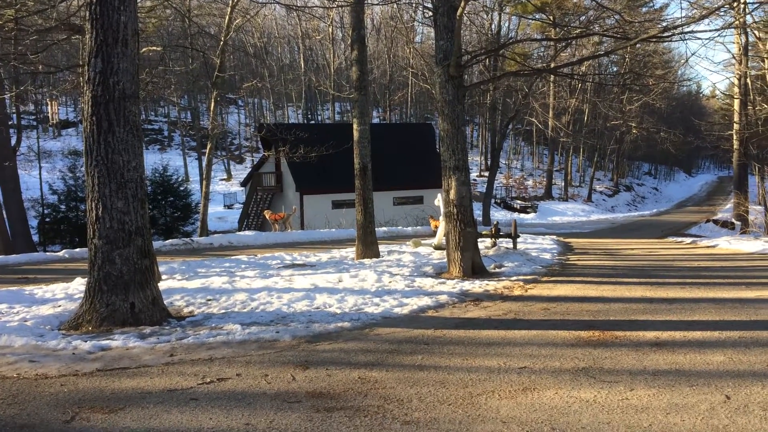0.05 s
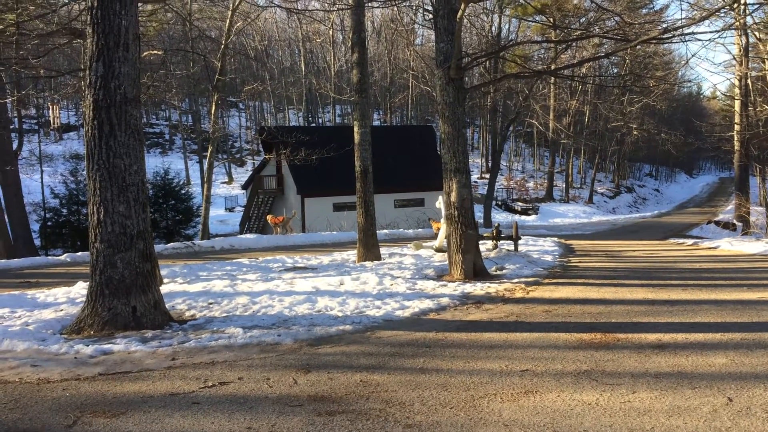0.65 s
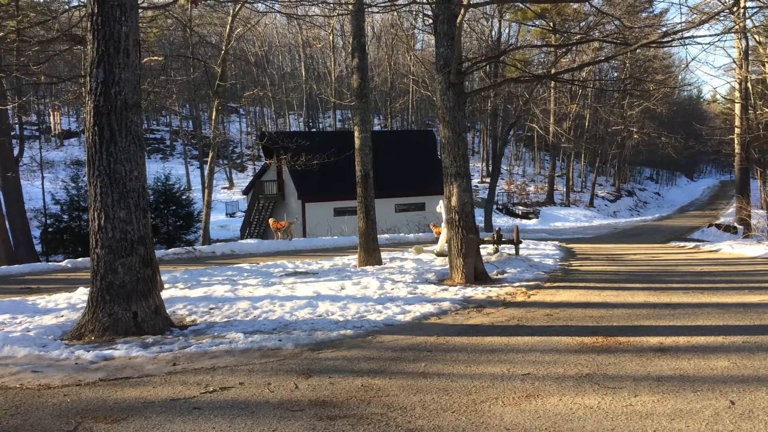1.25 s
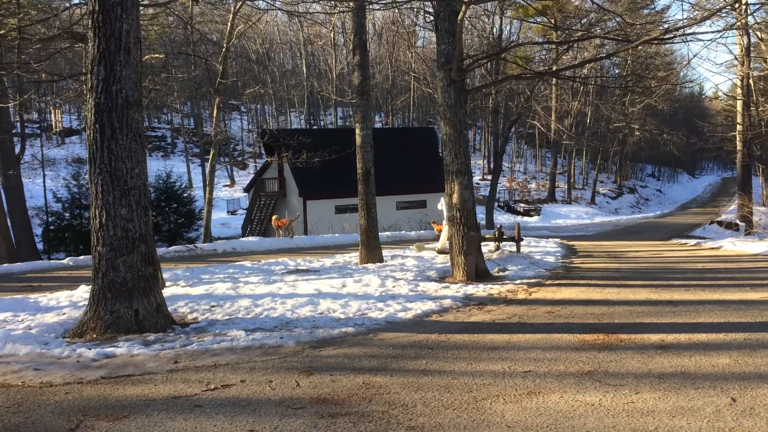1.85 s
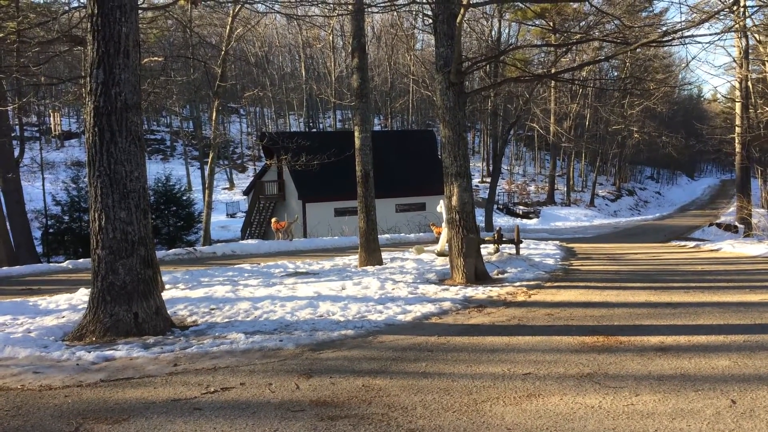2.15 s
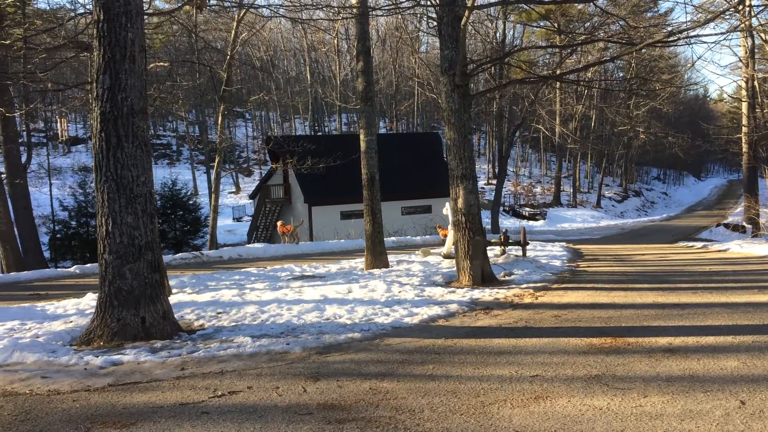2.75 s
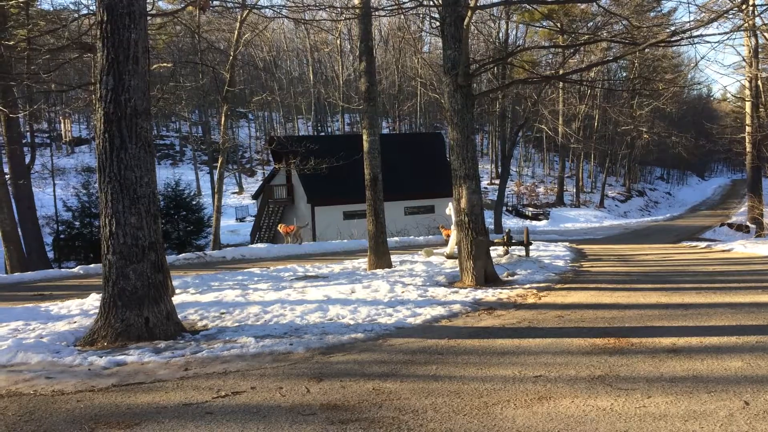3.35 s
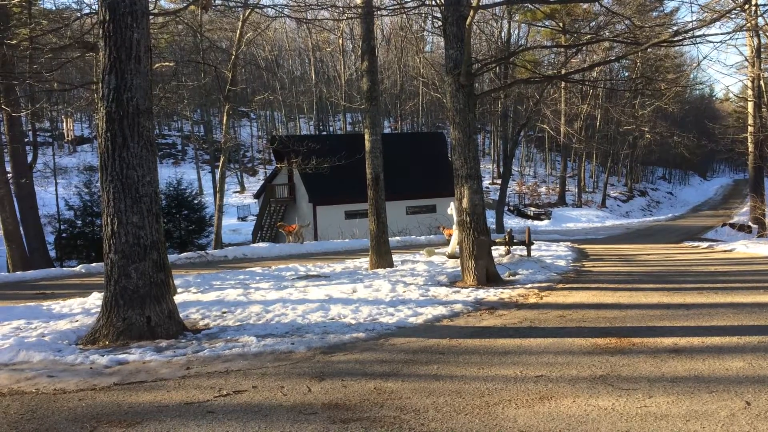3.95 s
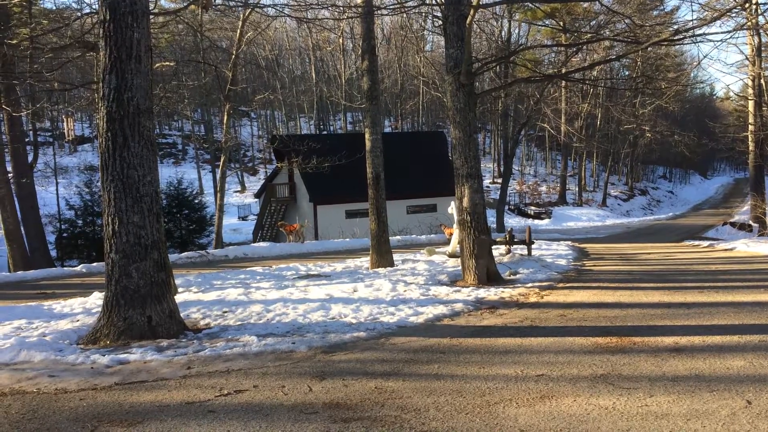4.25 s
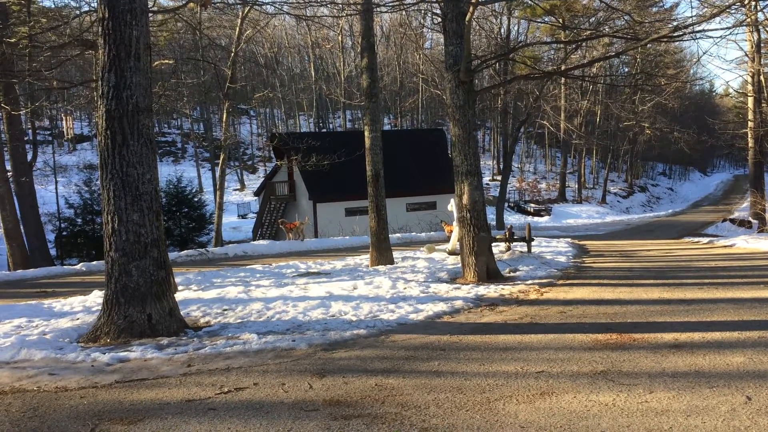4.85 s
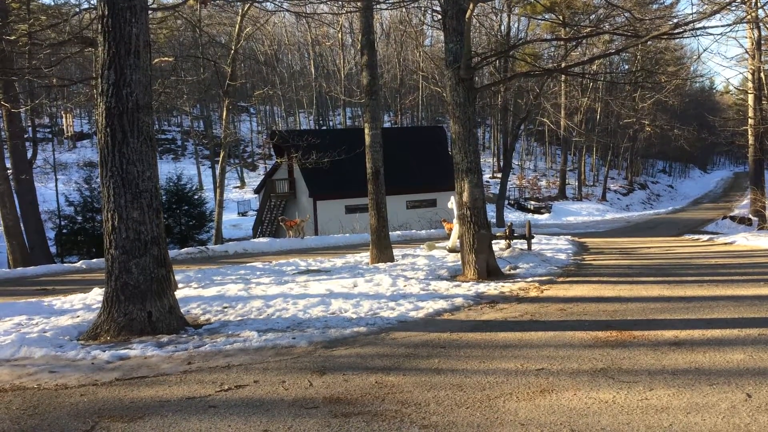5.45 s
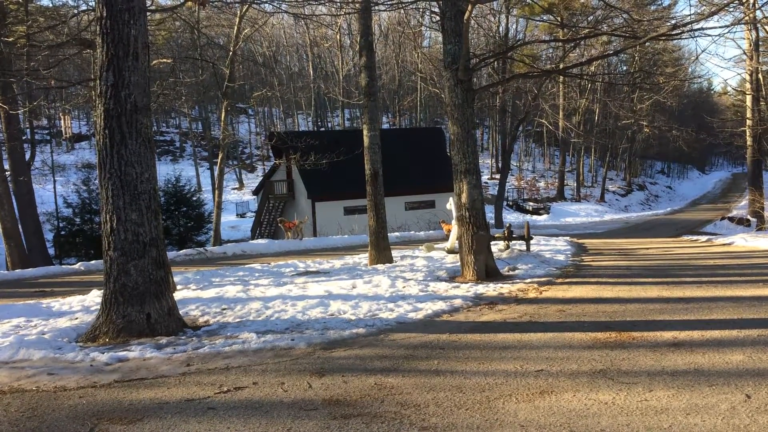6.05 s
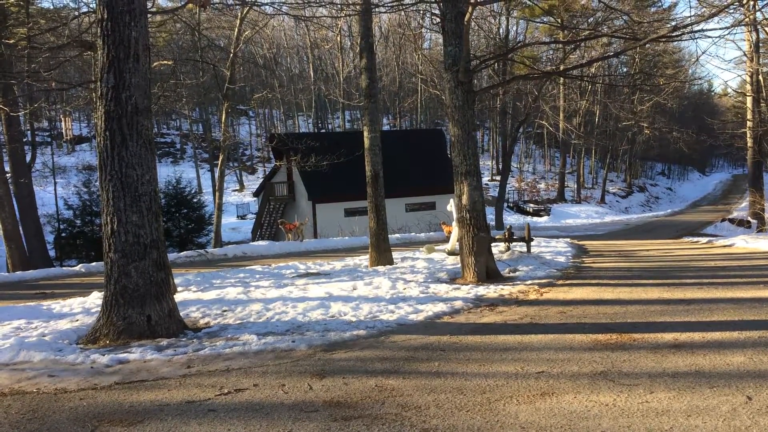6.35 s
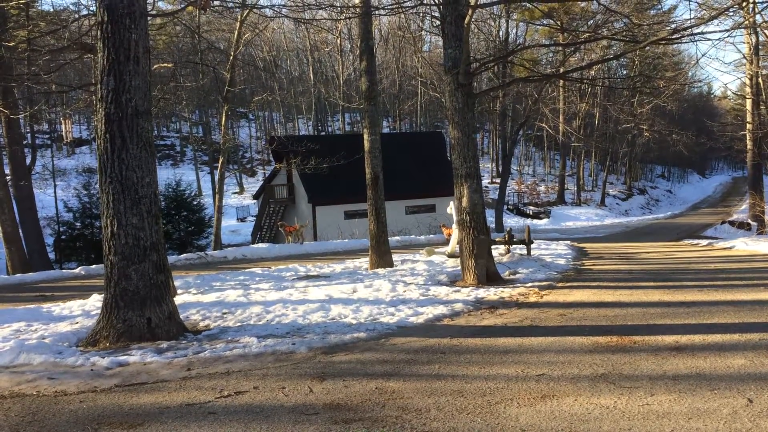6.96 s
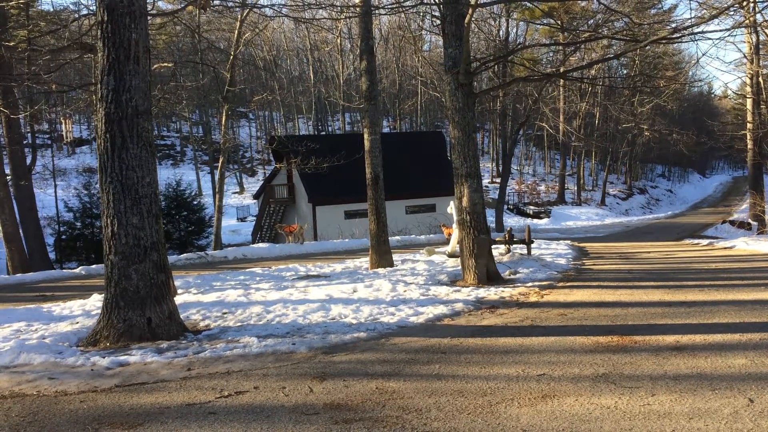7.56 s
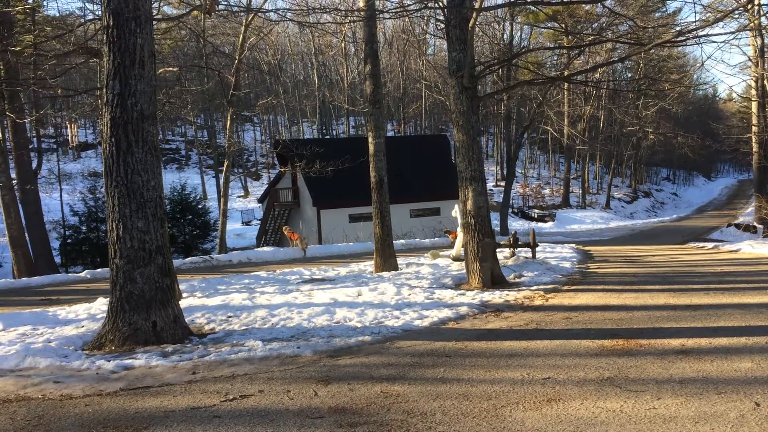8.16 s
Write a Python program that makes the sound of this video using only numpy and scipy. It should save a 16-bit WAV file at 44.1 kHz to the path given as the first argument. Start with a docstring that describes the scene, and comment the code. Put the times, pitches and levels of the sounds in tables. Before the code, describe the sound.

Small dogs bark rapidly outdoors in three bouts with pauses between, their voices echoing off a house and woods.

```python
"""Small dogs bark across a snowy yard, at first over the fading ring of an earlier bark.
Each bark is one arch of effort: it scoops up as a tone, breaks at the top and sags. A house wall and a
wooded slope throw it back. There are two dogs and three bouts. The second bout runs together into soft
hoots with a pursed mouth, while the other dog holds a steady howl.
A hand-held microphone picks up a few soft, low bumps over very quiet outdoor air."""
import sys
import numpy as np
from scipy import signal
from scipy.fft import rfft, irfft
from scipy.io import wavfile
from scipy.ndimage import uniform_filter1d

SR = 44100
rng = np.random.default_rng(int(sys.argv[2]) if len(sys.argv) > 2 else 0)


def output_pcm(signal):
    """Save a mono or channel-first signal as 16-bit PCM at the path in sys.argv[1].

    Samples are clipped to [-1, 1] before scaling.
    """
    pcm = np.clip(np.atleast_2d(signal).T, -1, 1) * 32767
    wavfile.write(sys.argv[1], SR, np.round(pcm).astype(np.int16))


N = 361161

# The barks. Each row: time of the top of the arch, rise time, fall time and delay from the top to the
# loudest moment, all in seconds; relative level in dB; snap (0 swells, 1 bursts open); first, top and
# last pitch in Hz; roughness while rising and while falling (0 to 1); crack (0 smooth, 1 breaks hard);
# mouth (0 pursed, 1 open, 2 or more wide); boosts in dB for chest tone, bite and facing the listener.
BARKS = [ (-.85, .05, .08, 0, -24, .7, 490, 520, 460, .4, .5, .2, .9, 2, 0, 0),
         (.283, .025, .14, .036, -31.5, 0, 462, 486, 335, .26, .5, .25, 1, 0, 0, 0),
         (.538, .064, .085, .028, -23.5, .05, 400, 494, 430, .34, .47, .5, 1.35, 5, -1, 0),
         (.79, .047, .08, .007, -26.5, .3, 436, 496, 390, .3, .33, .15, .78, 5, 0, 0),
         (1.062, .082, .052, .003, -30, .05, 385, 432, 428, .45, .3, 0, .95, 2, -2, 0),
         (1.19, .055, .042, .004, -32.5, .1, 440, 467, 451, .16, .18, 0, .35, 2, 3, 0),
         (1.305, .055, .063, .012, -30, .55, 432, 462, 452, .55, .4, .1, 1, 1, 0, 0),
         (1.54, .065, .065, .016, -27.5, .3, 470, 504, 460, .25, .5, .2, 1.4, 2, 2, 0),
         (3.335, .046, .095, .013, -25.5, .25, 390, 488, 430, .3, .52, .9, 1.3, 1, -1.5, 0),
         (3.607, .043, .061, -.012, -25.5, .85, 435, 552, 460, .14, .72, .6, 1.3, 1, 0, 0),
         (3.902, .046, .043, .003, -24, 0, 410, 505, 478, .36, .26, .1, 1.6, 3, 3, 1),
         (4.005, .035, .1, .008, -34.5, .2, 430, 452, 436, .55, .45, .3, 1.25, 3, 3, 0),
         (4.222, .047, .04, .007, -29.5, .05, 380, 478, 430, .22, .42, .1, .85, 7, 7, 0),
         (4.295, .035, .07, .015, -39, .7, 430, 422, 395, .42, .5, 0, .9, 4, 5, 0),
         (4.44, .08, .12, -.015, -39.5, 1, 420, 492, 450, .52, .55, 0, .24, 1, 2, 0),
         (4.63, .06, .13, -.01, -42.5, 1, 440, 477, 415, .3, .28, 0, .15, 2, 0, 0),
         (4.82, .045, .11, 0, -45, .3, 415, 468, 380, .12, .3, 0, .05, 3, -2, 0),
         (5.025, .075, .08, .004, -40, 0, 410, 472, 365, .17, .16, 0, .1, 5, -1, 0),
         (5.245, .055, .098, .005, -39, .5, 400, 471, 428, .1, .2, 0, .7, 3.5, 5, 0),
         (7.464, .035, .069, .026, -25, 1, 384, 515, 442, .38, .5, .9, 2.4, 5, -2, 4),
         (7.912, .069, .098, .012, -29.5, .4, 445, 502, 452, .46, .46, .1, 1.4, 3, 0, 0),
         (8.13, .055, .09, .008, -25, .35, 455, 555, 500, .56, .45, 0, 1.7, 7, -2, 2), ]
# How throat and mouth colour the voice, for three openings. Each row: frequency in Hz, boost in dB.
PURSED_MOUTH = [(280, -24.5), (380, -3), (480, -4), (650, -9), (920, -15), (1130, -9.5), (1380, -26.5),
                (1620, -28.5), (1950, -16.5), (2300, -51.5), (2900, -50), (3350, -43), (4400, -55.5),
                (7200, -46.5), (8200, -63)]
OPEN_MOUTH = [(200, -14), (290, -32), (400, -7), (500, 1), (700, -8), (900, -5), (1130, -6.5), (1380, 2),
              (1650, -20.5), (2400, -22.5), (2800, -46.5), (3250, -43), (4400, -55), (6900, -51.5),
              (8600, -57.5)]
WIDE_MOUTH = [(200, -19.5), (290, -32.5), (400, -9), (520, 1.5), (720, -5.5), (880, 2.5), (1350, 0),
              (1750, 7), (2080, -13), (2500, -5.5), (3100, -27), (4300, -40.5), (6500, -33), (8600, -49.5),
              (14000, -41.5)]
# Single echoes from ground, house and trees. Each row: delay in seconds, level in dB.
ECHOES = [(.0042, -28.5), (.019, -12), (.043, -22), (.082, -19.5), (0.126, -16)]
# Sound scattered by nearby trunks and by the far wooded slope.
# Each row: frequency in Hz, level in dB, seconds it takes to fade by 60 dB.
NEAR_TRUNKS = [(200, -4, 1), (500, -9, 0.99), (1000, -5, 0.77), (1480, -12, 0.56), (2450, -7.2, 0.63),
               (7200, 0, 0.48), (14300, -6, 0.94)]
FAR_SLOPE = [(198, -22, 2.6), (464, -13, 3.21), (930, -17, 2.6), (1420, -16.5, 1.47), (2624, -23.5, 4.3),
             (7000, -22.5, 1.1), (14000, -28.5, .4)]
# Soft bumps on the microphone. Each row: time in seconds, level in dB, length in seconds, upper edge in Hz.
BUMPS = [(1.633, -48, 0.024, 161.5), (1.787, -43, 0.022, 114.8), (2.26, -49.5, 0.019, 196.7),
         (2.684, -49.5, 0.07, 106), (2.843, -48, 0.02, 160.4), (3.017, -50.5, 0.045, 78.2),
         (3.057, -45.5, .025, 113), (4.607, -46.5, 0.011, 203.7), (6.681, -55.5, 0.033, 130),
         (6.981, -55.5, 0.024, 130), (7.871, -47, 0.014, 120)]
# The colour of still air. Each row: frequency in Hz, relative level in dB.
AIR_COLOUR = [(18, -19.5), (40, -4), (80, -1.5), (190, -7), (300, -13.5), (500, -13.5), (900, -15),
              (1400, -23.5), (2400, -30.5), (5000, -33.5), (15000, -36.5)]

LEAD = SR  # samples of run-up, so that an earlier bark still rings in the woods
EDGE_HZ, AIR_DB = 15300, -66  # top of the treble; level of the air
ONSET_DB, RELEASE_DB = -12.5, -12  # a bark's two ends, compared with its loudest moment
SCOOP_CURVE, SAG_CURVE = 1.35, 1.15  # 1 is a straight pitch glide, 2 a rounded one
BREAK_S, BREAK_LENGTH_S, BREAK_CHEST_DB = .022, .022, -16  # the chest tone dips as the voice breaks
MOUTH_AT_ONSET, MOUTH_AT_END = .38, .72  # share of its full opening; full snap starts it fully open
SNAP_FULLNESS, SNAP_BITE_DB = 1.3, 6  # snap flattens the top of the arch and sharpens its start
BITE_LOW_HZ, BITE_HIGH_HZ = 1750, 2950  # where a bark sounds sharp; above this lies the throat's hiss
HISS_ONSET_DB, HISS_TOP_DB, HISS_END_DB = -2, -.5, 6  # the hiss comes out as the tone dies
HISS_FORCE_SHARE, HISS_EVEN_DB = .3, -31  # and grows less than the tone in barks louder than this
BEAM_HZ = 750  # above this the mouth throws its sound forward
HOWL_START_S, HOWL_END_S, HOWL_HZ = 4.6, 5.39, 470
HOWL_DB, HOWL_SWELL_DB, HOWL_SWELL_S = -50, 4.5, .15  # the howl swells just before it stops
HOWL_ROUGH, HOWL_END_ROUGH, HOWL_MOUTH, HOWL_CHEST_DB = .33, .19, .1, -1.5


def bark(s, rise_s, fall_s, lag_s, level_db, snap, first_hz, top_hz, last_hz,
         rise_rough, fall_rough, crack, mouth, chest_db, bite_db):
    """One arch of effort drives loudness, pitch and mouth; past the top the voice can break."""
    t = np.linspace(-rise_s, fall_s, 48)  # zero is the top of the arch
    early = np.maximum(-t / rise_s, 0)
    late = np.maximum(t / fall_s, 0)
    broken = np.clip(t / BREAK_S, 0, 1)
    sag = (1 - crack) * late ** SAG_CURVE + crack * broken
    pitch_hz = top_hz + (first_hz - top_hz) * early ** SCOOP_CURVE + (last_hz - top_hz) * sag
    ease = np.interp(t, [-rise_s, lag_s, fall_s], [1, 0, 1])
    loudness_db = level_db + np.where(t < lag_s, ONSET_DB, RELEASE_DB) * ease ** (1 + SNAP_FULLNESS * snap)
    rough = rise_rough + (fall_rough - rise_rough) * broken
    first_opening = MOUTH_AT_ONSET + (1 - MOUTH_AT_ONSET) * np.sqrt(snap)
    mouth_times = [-rise_s, (lag_s - rise_s) / 2, lag_s, fall_s]
    opening = mouth * np.interp(t, mouth_times, [first_opening, 1, 1, MOUTH_AT_END])
    dip_db = crack * BREAK_CHEST_DB * broken * np.exp(-((t - BREAK_S) / BREAK_LENGTH_S) ** 2)
    start, voice = dog_voice(s + t, loudness_db, pitch_hz, rough, opening, chest_db + dip_db)
    voice = lift_band(voice, bite_db + SNAP_BITE_DB * np.sqrt(snap) * early, BITE_LOW_HZ, BITE_HIGH_HZ)
    hiss_db = np.interp(t, [-rise_s, lag_s, fall_s], [HISS_ONSET_DB, HISS_TOP_DB, HISS_END_DB])
    hiss_db += HISS_FORCE_SHARE * (HISS_EVEN_DB - level_db) * (1 - snap)
    return start, lift_band(voice, hiss_db, BITE_HIGH_HZ, EDGE_HZ)


def howl():
    """One held note through a pursed mouth, growing louder and clearer toward its end."""
    t = np.linspace(HOWL_START_S, HOWL_END_S, 48)
    swell = np.exp((t - HOWL_END_S) / HOWL_SWELL_S)
    rough = HOWL_ROUGH + (HOWL_END_ROUGH - HOWL_ROUGH) * swell
    return dog_voice(t, HOWL_DB + HOWL_SWELL_DB * swell, HOWL_HZ, rough, HOWL_MOUTH, HOWL_CHEST_DB)


def dog_voice(times, *curves, low_edge_hz=120):
    """The buzz of the vocal folds passes through the throat. Gives the start time and the sound."""
    t = np.arange(times[0] - .006, times[-1] + 0.02, 1 / SR)
    level_db, pitch_hz, rough, mouth, chest_db = (
        np.interp(t, times, curve) for curve in np.broadcast_arrays(*curves))
    voice = throat(vocal_folds(pitch_hz, rough, mouth), mouth, chest_db, pitch_hz)
    voice = signal.sosfilt(signal.butter(2, low_edge_hz, "high", fs=SR, output="sos"), voice)
    power = uniform_filter1d(uniform_filter1d(voice ** 2, size=700), size=500)
    voice = voice / np.sqrt(abs(power) + 1e-9)  # even it out, so that level_db shapes the loudness
    fade = np.clip((t - t[0]) / 0.01, 0, 1) * np.clip((t[-1] - t) / 0.013, 0, 1)
    return t[0], gain_of(level_db) * np.sin(np.pi / 2 * fade) ** 2 * voice


def vocal_folds(pitch_hz, rough, mouth, jitter=.09, jitter_hz=170, waver=.009, shimmer=0.94,
                half_tone=.35, rasp=0.98, fold_hz=1700, slack=0.98, whine_level=0.34):
    """The rougher the voice, the more unevenly the folds shake and the more puffs of noise get through."""
    size = len(pitch_hz)
    # slack folds at a low pitch turn hoarse
    rough = np.clip(rough + slack * np.maximum(1 - pitch_hz / 435, 0), 0, .9)
    wobble = 1 + jitter * rough * wander(size, jitter_hz) + waver * wander(size, 35)
    cycles = np.cumsum(pitch_hz * wobble) / SR
    reach_hz = fold_hz * np.maximum(mouth, 1) ** 0.49  # a harder bark reaches higher
    tone = np.zeros(size)
    for k in range(1, 6):
        # the upper overtones are weak and are the first to dissolve into rasp
        strength = (1 - rough) ** ((k - 1) / 6) / np.sqrt(1 + (k * pitch_hz / reach_hz) ** 10)
        tone += strength * np.cos(2 * np.pi * k * cycles)
    # strong and weak cycles take turns when the voice breaks
    flutter = shimmer * wander(size, 150) + half_tone * np.cos(np.pi * cycles)
    tone = tone * np.sqrt(4 * pitch_hz / SR) * (1 + rough * flutter)
    puffs = evened((0.52 + np.exp(-(cycles % 1) / 0.2)) * rng.standard_normal(size))
    # a thin whine of high overtones rides on top, spread over the cycle
    whine = evened(sum(np.cos(2 * np.pi * k * cycles + k ** 2 / np.pi) for k in range(7, 18)))
    return np.sqrt(1 - rough ** 2) * (tone + whine_level * whine) + rasp * rough * puffs


def throat(buzz, mouth, chest_db, pitch_hz, chest_hz=660, follow=0.19):
    """The mouth opening colours the voice; the frequencies it favours rise a little with the pitch."""
    hz, t, spectra = signal.stft(buzz, SR, nperseg=512, noverlap=384)
    mouth, chest_db, pitch_hz = (
        np.interp(t * SR, np.arange(len(buzz)), curve) for curve in (mouth, chest_db, pitch_hz))
    hz = hz[:, None] / (pitch_hz / 470) ** follow
    colour_db = 0
    for opening, shape in enumerate((PURSED_MOUTH, OPEN_MOUTH, WIDE_MOUTH)):
        share = np.maximum(1 - abs(np.clip(mouth, 0, 2) - opening), 0)
        colour_db += share * look_up(shape, hz)
    gain = gain_of(colour_db + chest_db / (1 + (hz / chest_hz) ** 8))
    gain = gain / np.sqrt(np.mean(gain ** 2, 0))
    return signal.istft(spectra * ring_after(gain), SR, nperseg=512, noverlap=384)[1][:len(buzz)]


def ring_after(gain):
    """Makes each column of gains act like a real hollow, which rings only after it is struck."""
    cepstrum = irfft(np.log(gain), axis=0)
    half = len(cepstrum) // 2
    # move all ringing from before the strike to after it
    weights = np.concatenate([[1], np.full(half - 1, 2), [1], np.zeros(half - 1)])
    return np.exp(rfft(cepstrum * weights[:, None], axis=0))


def lift_band(voice, curve_db, low_hz, high_hz):
    """Turns one band of frequencies up or down along a curve that spans the bark."""
    hz = np.fft.rfftfreq(SR, 1 / SR)
    in_band = 1 / (1 + (hz / high_hz) ** 20) - 1 / (1 + (hz / low_hz) ** 20)
    band = irfft(rfft(voice, SR) * in_band)[:len(voice)]
    curve_db = np.interp(np.linspace(0, 1, len(voice)), np.linspace(0, 1, len(curve_db)), curve_db)
    return voice + (gain_of(curve_db) - 1) * band


def mouth_beam(voice, facing_db):
    """The extra treble that a dog throws straight at the listener it faces."""
    hz = np.fft.rfftfreq(SR, 1 / SR)
    treble = 1 - 1 / (1 + (hz / BEAM_HZ) ** 8)
    return irfft(rfft(voice, SR) * gain_of(facing_db * treble))[:len(voice)] - voice


def yard(sound):
    """The direct sound, a few hard echoes and the long wash of the woods."""
    response = tree_scatter(NEAR_TRUNKS, onset_s=0.017) + tree_scatter(FAR_SLOPE, onset_s=0.16)
    response[0] += 1  # the direct sound
    for delay_s, level_db in ECHOES:
        response[round(delay_s * SR)] += gain_of(level_db)
    return signal.fftconvolve(sound, response)[:len(sound)]


def tree_scatter(bands, onset_s, echoes_per_s=3000):
    """Many tiny echoes from trees blur into a tail; each band has its own level and fading time."""
    echoes = rng.choice([-1., 1.], 3 * SR) * (rng.random(3 * SR) < echoes_per_s / SR)
    hz, t, spectra = signal.stft(evened(echoes), SR, nperseg=256)
    build_up = 1 - np.exp(-(t / onset_s) ** 2)
    tail = build_up * gain_of(-60 * t / look_up(bands, hz, column=2)[:, None])
    tail = tail / np.sqrt(np.sum(tail ** 2, 1, keepdims=True) * t[1] * SR)
    level = gain_of(look_up(bands, hz))[:, None]
    return signal.istft(spectra * tail * level, SR, nperseg=256)[1][:3 * SR]


def microphone_bumps(low_hz=45):
    """Short swells of low noise from the hand and the air at the microphone."""
    mix = np.zeros(N + LEAD)
    t = np.arange(-SR // 4, SR // 4) / SR
    for s, level_db, length_s, edge_hz in BUMPS:
        low_band = signal.butter(3, [low_hz, edge_hz], "band", fs=SR, output="sos")
        noise = signal.sosfilt(low_band, rng.standard_normal(len(t)))
        swell = noise * np.exp(-(2 * t / length_s) ** 2 / 2)
        swell = swell / np.sqrt(np.sum(swell ** 2) / (length_s * SR))
        add(mix, s + t[0], gain_of(level_db) * swell)
    return mix[LEAD:]


def still_air(flutter_db=3, rumble_hz=200):
    """Still outdoor air: an uneven low rumble under a smooth, faint hiss."""
    hz = np.fft.rfftfreq(N, 1 / SR)
    noise = evened(irfft(rfft(rng.standard_normal(N)) * gain_of(look_up(AIR_COLOUR, hz)), N))
    rumble = irfft(rfft(noise) / (1 + (hz / rumble_hz) ** 4), N)
    swell = np.interp(np.arange(N), np.linspace(0, N, 60), rng.standard_normal(60))
    return gain_of(AIR_DB) * (noise + rumble * (gain_of(flutter_db * swell) - 1))


def wander(size, rate_hz):
    """A smooth random wiggle that moves up to about the given rate."""
    hz = np.fft.rfftfreq(SR, 1 / SR)
    return evened(irfft(rfft(rng.standard_normal(SR)) / (1 + (hz / rate_hz) ** 4)))[:size]


def gain_of(db):
    """Turns decibels into a number to multiply by."""
    return 10 ** (np.asarray(db) / 20)


def evened(sound):
    """Scales a sound to an average power of 1."""
    return sound / np.sqrt(np.mean(sound ** 2) + 1e-20)


def look_up(rows, hz, column=1):
    """Reads a table at any frequency, gliding between its rows on a musical scale."""
    table = np.transpose(rows)
    return np.interp(np.log(hz + 1), np.log(table[0] + 1), table[column])


def add(mix, s, sound):
    """Mixes a sound in at s seconds, counted from the end of the run-up."""
    part = mix[max(round(s * SR) + LEAD, 0):][:len(sound)]
    part += sound[:len(part)]


def scene(dogs_db=0.6):
    """The dogs in the echoing yard, over the air and the bumps, in one channel."""
    dogs, beamed = np.zeros((2, N + LEAD))
    for *row, facing_db in BARKS:
        start, voice = bark(*row)
        add(dogs, start, voice)
        add(beamed, start, mouth_beam(voice, facing_db))
    add(dogs, *howl())
    dogs_in_yard = gain_of(dogs_db) * (yard(dogs) + beamed)[LEAD:]
    return (dogs_in_yard + still_air() + microphone_bumps())[None]


def record(dry):
    """Cuts off the very highest treble steeply."""
    treble_cut = signal.firwin(511, EDGE_HZ, window=("kaiser", 9), fs=SR)
    return signal.oaconvolve(dry, treble_cut[None], "same")


dry = scene()
out = record(dry)
output_pcm(out)
```